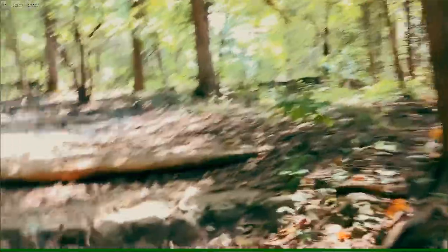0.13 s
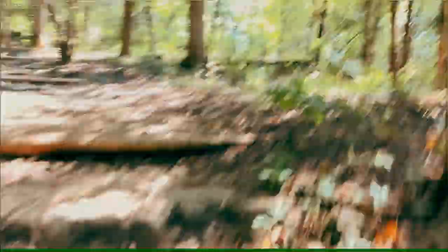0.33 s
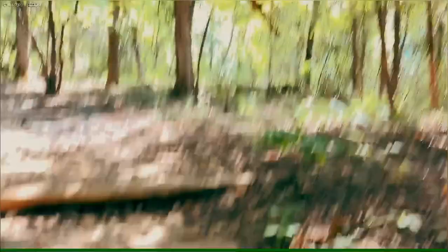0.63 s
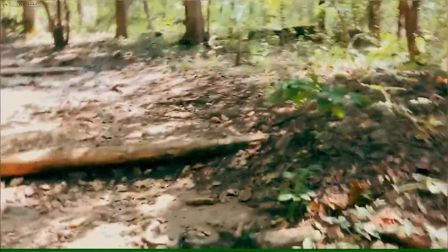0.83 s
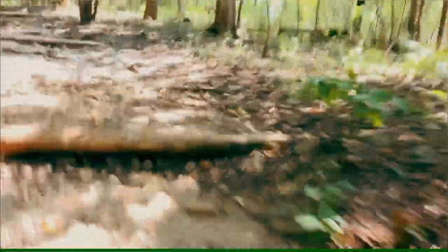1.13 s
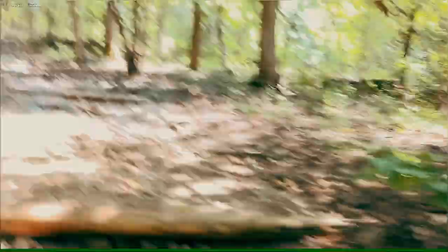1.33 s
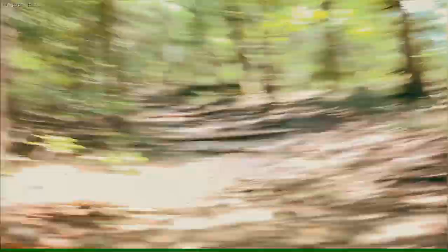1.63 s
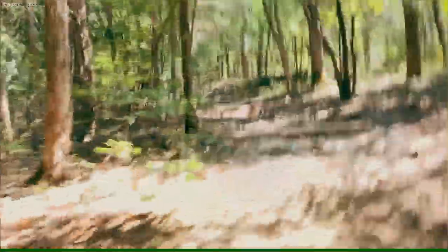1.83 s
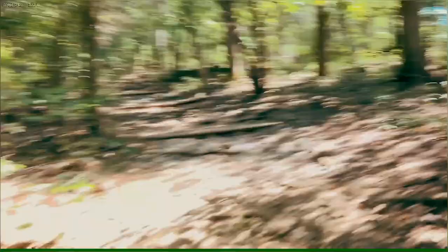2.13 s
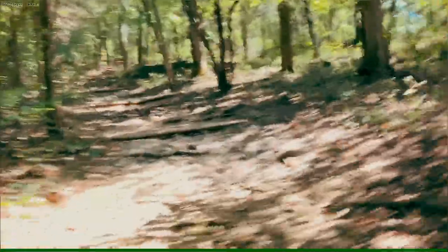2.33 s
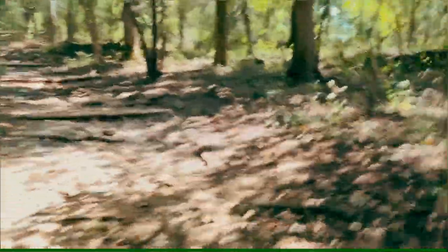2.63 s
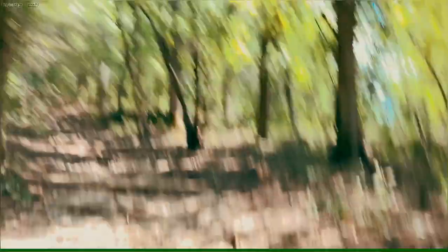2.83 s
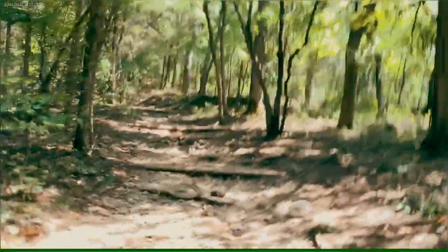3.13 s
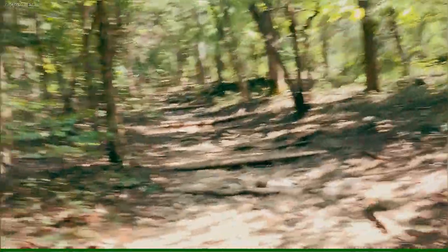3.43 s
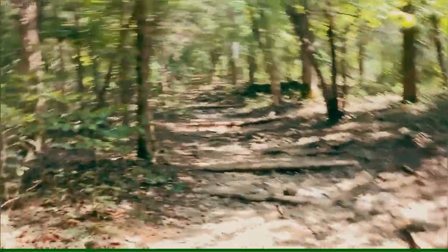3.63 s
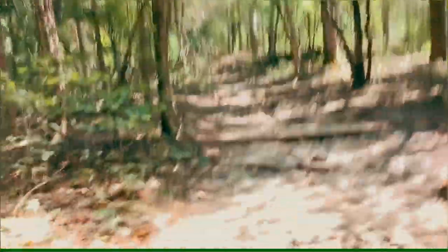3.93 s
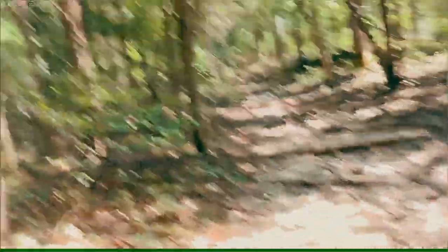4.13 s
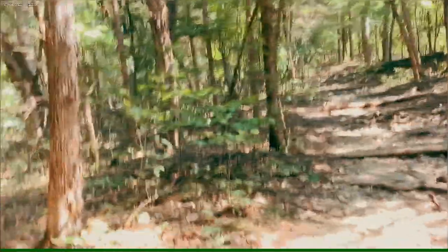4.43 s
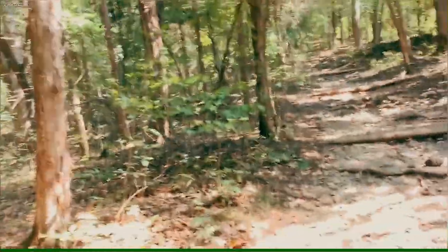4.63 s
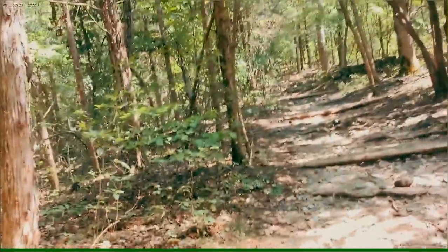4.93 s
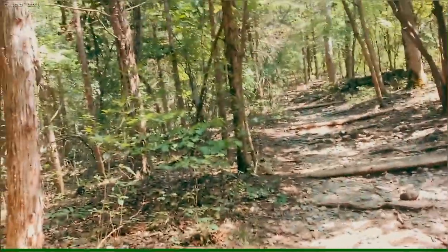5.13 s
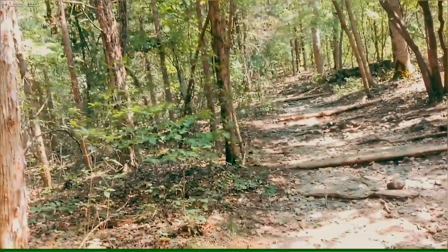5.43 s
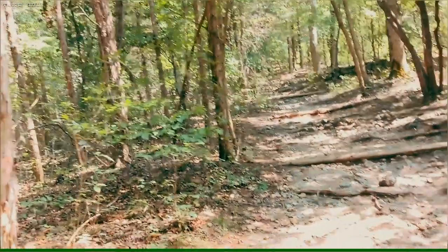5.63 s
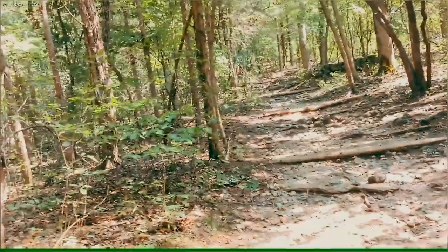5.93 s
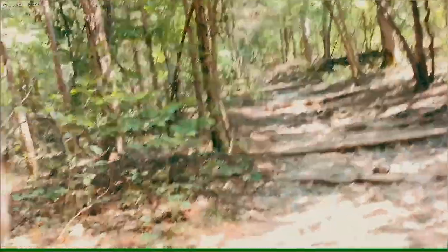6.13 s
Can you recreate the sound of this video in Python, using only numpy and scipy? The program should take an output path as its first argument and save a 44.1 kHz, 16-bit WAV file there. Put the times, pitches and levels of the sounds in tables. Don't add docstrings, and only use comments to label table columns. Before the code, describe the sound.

Outdoors in dry summer woodland, a dense high cicada chorus buzzes and wavers, two nearer singers slowly quickening. A hand-held microphone catches a loud gritty footstep at the start, more scuffs and a low handling knock near two seconds, then a sharp twig snap and finer stalk click near four. One more step follows, then the insects thin out over soft air, with a faint low engine hum.

```python
import sys
import numpy as np
from scipy import signal
from scipy.fft import rfft, irfft, next_fast_len
from scipy.io import wavfile
from scipy.ndimage import uniform_filter1d

SR = 44100
rng = np.random.default_rng(int(sys.argv[2]) if len(sys.argv) > 2 else 0)


def amplitude_ratio(level_db):
    exponent = np.asarray(level_db, float) / 20
    return 10 ** exponent


def int16_out(signal):
    q = np.round(np.clip(np.atleast_2d(signal).T, -1, 1) * 32767)
    wavfile.write(sys.argv[1], SR, q.astype(np.int16))


N = 277355
TIME_S = np.arange(N) / SR


def white():
    return rng.standard_normal(N)


def rms_one(x):
    return x / np.sqrt(np.mean(x ** 2) + 1e-20)


def in_time(rows, silent=None):
    s, *columns = np.transpose(rows)
    return [np.interp(TIME_S, s, column, silent, silent) for column in columns]


def at_hz(points, hz):
    points_hz, points_db = np.transpose(points)
    return np.interp(np.log(hz), np.log(points_hz), points_db, -90, -90)


def drift(rate_hz):
    r = np.exp(-80 * np.pi * rate_hz / SR)
    chance = rng.standard_normal(N // 40 + 2002)
    slow = signal.lfilter([1], [1, -2 * r, r * r], chance)[2000:]
    return np.interp(np.arange(N) / 40, np.arange(len(slow)), rms_one(slow))


def coloured(spectrum, x):
    size = next_fast_len(N)
    hz = np.arange(1, size // 2 + 2) * SR / size
    return rms_one(irfft(rfft(x, size) * amplitude_ratio(at_hz(spectrum, hz)), size)[:N])


def band(x, low_hz, high_hz):
    return signal.sosfilt(signal.butter(2, [low_hz, high_hz], "band", fs=SR, output="sos"), x)


def ring(clicks, hz, t60_s):
    r = amplitude_ratio(-60 / (max(t60_s, 1e-3) * SR))
    w = 2 * np.pi * hz / SR
    return signal.lfilter([0, np.sin(w)], [1, -2 * r * np.cos(w), r * r], clicks + 1e-18)


def clicks_at(times_s, heights):
    out = np.zeros(N)
    np.add.at(out, np.round(np.asarray(times_s) * SR).astype(int), heights)
    return out


def cicada(cycles_hz, spectrum, second, echo_s):
    turns = 2 * np.cumsum(cycles_hz) / SR + rng.random()
    at = np.flatnonzero(np.diff(np.floor(turns)))
    late = (np.ceil(turns[at]) - turns[at]) / (turns[at + 1] - turns[at])
    height = np.where(np.floor(turns[at]) % 2, second[at], 1)
    buckles = np.zeros(N)
    buckles[at] = height * (1 - late)
    buckles[at + 1] = height * late
    echoes = rng.standard_normal(8000) * np.exp(-np.arange(8000) / SR / echo_s)
    return coloured(spectrum, signal.fftconvolve(buckles, echoes)[:N])


def crowd(spectrum, count, hiss_share):
    out = 0
    for start_hz, speeding in rng.uniform([160, 0.3], [195, 1.4], (count, 2)):
        cycles_hz = start_hz + speeding * TIME_S + 0.25 * drift(1.5) + 0.0995 * drift(8.47)
        song = cicada(cycles_hz, spectrum, second=np.full(N, 0.5), echo_s=0.048)
        out = out + amplitude_ratio(0.58 * drift(0.48)) * song
    return rms_one(rms_one(out) + hiss_share * coloured(spectrum, white()))


# (time [s], level [dB])
CHORUS_LEVEL = [(0.0, -38.5), (0.47, -37.5), (0.62, -41), (0.91, -38), (1.1, -41), (1.5, -39),
                (1.89, -38.5), (2.28, -42.5), (2.65, -41.5), (2.94, -39.5), (3.3, -40), (3.9, -43.5),
                (4.1, -41.5), (4.31, -41.5), (4.65, -44), (5.27, -48), (5.69, -47.5), (6.29, -55)]
LOW_LEVEL = [(0.0, -55), (0.3, -64.5), (1.1, -59.5), (2.0, -55.5), (3.0, -56.5), (3.5, -59.5), (3.9, -53.5),
             (4.3, -59.5), (5.27, -64), (6.29, -74)]
# (frequency [Hz], density [dB per Hz])
SONG = [(3060, -47.5), (5200, -16.5), (6390, 0), (6770, 1), (8750, -10.5), (9780, -29.5), (12700, -58),
        (21500, -120)]
LOW_SONG = [(4150, -35), (4400, -1.5), (4700, 4), (5300, -8.5), (6000, 10.5)]
EDGE_SONG = [(8600, -13), (9000, 3.5), (9600, -3.5), (10000, -14), (10250, -35)]


def chorus():
    (main_db,), (low_db,) = in_time(CHORUS_LEVEL), in_time(LOW_LEVEL)
    main_gain = amplitude_ratio(main_db - 3.5 + 0.92 * drift(6.4) + 1.3 * drift(24.0))
    main = main_gain * crowd(SONG, count=6, hiss_share=0.8)
    edge = crowd(EDGE_SONG, count=2, hiss_share=0.97)
    low = amplitude_ratio(low_db + 2.0 * drift(14.0)) * crowd(LOW_SONG, count=3, hiss_share=0.49)
    edge_db, fade_db_per_s, waver_db = -56.5, 4.5, 2.5
    edge_gain = amplitude_ratio(edge_db - fade_db_per_s * TIME_S + waver_db * drift(2.8))
    return main + edge_gain * edge + low


def near_singer(speed, loudness, gain_db, second):
    (cycles_hz,), (level_db,) = in_time(speed), in_time(loudness, silent=-120)
    level = uniform_filter1d(amplitude_ratio(level_db + gain_db), size=4000) * amplitude_ratio(1.5 * drift(4.0))
    return level * cicada(cycles_hz + 0.0824 * drift(7.9), SONG, second, echo_s=0.022)


# (time [s], song cycles [Hz])
SPEED_A = [(0.0, 178.5), (1.0, 179.1), (2.0, 179.95), (3.0, 181.15), (4.0, 182.5), (4.75, 183.3),
           (5.25, 184.6), (5.75, 184.5)]
SPEED_B = [(1.0, 173.0), (1.75, 174.0), (2.5, 174.45), (3.5, 176.4), (4.0, 177.3), (4.5, 179.25),
           (5.5, 178.9)]
# (time [s], level [dB])
LEVEL_A = [(0.0, -45), (0.9, -43), (1.25, -52), (3.75, -49.5), (4.0, -51), (5.0, -48.5), (5.75, -64)]
LEVEL_B = [(1.0, -56), (1.75, -49.5), (3.7, -45), (4.0, -47), (4.4, -45.5), (4.75, -59.5), (5.5, -56.5)]


def near_singers():
    turn_s = 4
    facing = 0.5 * np.tanh(TIME_S - turn_s)
    first = near_singer(SPEED_A, LEVEL_A, gain_db=0.85, second=facing)
    return first + near_singer(SPEED_B, LEVEL_B, gain_db=2.0, second=np.full(N, 0.5))


# (frequency [Hz], density [dB per Hz])
HILLSIDE = [(2530, -49), (4300, -10), (4950, -25), (5090, -10), (5530, -6.5), (6280, -0.5), (6560, 0),
            (7150, 1.5), (9780, -22), (12700, -40), (21500, -120)]


def far_hillside():
    level_db = -50.5
    return amplitude_ratio(level_db - 2.5) * coloured(HILLSIDE, white())


# (frequency [Hz], density [dB per Hz])
AIR = [(150, -1.5), (300, -3.5), (600, -7.5), (1200, -13.5), (2500, -18.5), (4000, -21), (8000, -21.5),
       (10000, -26), (12000, -30), (16000, -30)]


def forest_air():
    level_db = -55.5
    return amplitude_ratio(level_db + 0.43 * drift(2.0)) * coloured(AIR, white())


# (time [s], rise over calm [dB], length [s])
GUSTS = [(0.5, 5, 0.38), (1.134, 17, 0.09), (1.304, 8, .12), (1.855, 5, 0.62), (2.3, 10.5, .12),
         (2.64, 6, 0.2), (3.03, 8, 0.082), (3.43, 2, 0.062), (3.902, 11.5, 0.056), (4.9, 7, 0.33),
         (5.255, 9, 0.055), (5.5, 3, 0.09), (5.764, 8, 0.091), (6.034, 7, 0.2), (6.29, 9, 0.045)]


def wind():
    deep_db, low_db, lumps_db, low_follows = -54.5, -55, 2, 0.044
    gust_db = sum(db * np.exp(-((TIME_S - s) / length_s) ** 2 * 2) for s, db, length_s in GUSTS)
    deep = amplitude_ratio(deep_db + gust_db) * rms_one(band(white(), 24.7, 63.8))
    low_gain = amplitude_ratio(low_db + low_follows * gust_db + lumps_db * drift(2.3))
    return deep + low_gain * rms_one(band(white(), 58.0, 155.7))


def swell(s, db, rise_s, fall_s):
    range_db = 20
    age = TIME_S - s
    spans = np.where(age < 0, -age / max(rise_s, 0.002), age / max(fall_s, 0.002))
    return amplitude_ratio(db - range_db * np.minimum(spans, 6))


# (most pressure [s], level [dB], brightness [dB], build-up [s], dying away [s])
SCUFFS = [(0.258, -40, -8, .02, 0.088), (0.3, -42.5, -8, 0.051, 0.0077), (0.316, -36, -28, 0.0082, 0.023),
          (0.4, -50.5, -10, 0.22, 0.23), (1.058, -47, -20, 0.017, 0.052), (1.214, -47.5, -26, 0.11, 0.014),
          (2.0, -46.5, -8, 0.21, 0.22), (2.113, -43, -22, .012, 0.011), (2.158, -54, -3, .015, 0.12),
          (2.33, -48, -18, 0.036, 0.084), (2.63, -50.5, -12, .06, 0.071), (2.872, -46.5, -16, 0.1, 0.046),
          (3.646, -60, 5, 0.044, .01), (3.75, -55.5, 8, 0.077, .03), (3.784, -56, 7.5, .02, 0.16),
          (4.24, -39.5, -16, 0.014, 0.022), (4.352, -52, -20, 0.046, .03), (4.7, -53.5, -2, .01, 0.1),
          (4.786, -46.5, -9, .012, 0.02)]


def crunch(per_s, spread_db, cycles):
    sizes = amplitude_ratio(spread_db * np.minimum(rng.exponential(1, N), 4)) * rng.choice([-1, 1], N)
    grains = sizes * (rng.random(N) < per_s / SR)
    dealt = rng.integers(0, 16, N)
    pitches_hz = np.geomspace(330, 4600, 16)
    rings = [ring(grains * (dealt == k), hz, cycles / hz) for k, hz in enumerate(pitches_hz)]
    coarse, fine = rms_one(sum(rings[:11])), rms_one(sum(rings[11:]))
    out = np.zeros(N)
    for s, db, bright_db, rise_s, fall_s in SCUFFS:
        out += swell(s, db - 4.5, rise_s, fall_s) * (coarse + amplitude_ratio(bright_db) * fine)
    return out


# (time [s], peak [dB], pitch [Hz], bright tick re peak [dB])
CRACKS = [(0.255, -21, 446, -17), (0.26, -26, 730, -27), (0.268, -23, 550, -6.5), (0.282, -22, 467, -15),
          (0.283, -25, 1490, -2), (0.293, -21.5, 1420, -6), (0.296, -26, 1230, -2), (0.314, -22, 1260, -21),
          (0.364, -35, 970, -16), (0.404, -38, 514, -25), (0.722, -37.5, 645, -10.5),
          (1.055, -30.5, 447, -26), (1.207, -34.5, 730, -21), (1.88, -35.5, 850, -24),
          (1.976, -35, 960, -19), (1.994, -31, 660, -17), (2.035, -31, 533, -6.5), (2.06, -36, 476, -21),
          (2.111, -28, 1310, -26), (2.17, -36.5, 740, -6), (2.23, -32.5, 1300, -26), (2.326, -39, 860, -20),
          (2.838, -41, 501, -21), (2.864, -38, 760, -29), (3.641, -36.5, 1780, -1), (3.777, -32, 999, -5),
          (3.813, -29, 711, -14), (4.23, -32.5, 705, -14), (4.242, -31.5, 1500, -21),
          (4.297, -41.5, 724, -4)]


def cracks():
    rise_s, t60_s = 0.0015, 0.014
    out, age = np.zeros(N), np.arange(1500) / SR
    for s, peak_db, hz, tick_db in CRACKS:
        start = round((s + rise_s) * SR)
        chance = rng.standard_normal((2, 1500))
        crumbs = 0.078 * chance[0] * np.exp(-age / 0.0055)
        push = amplitude_ratio(peak_db - 7.0) * ((age == 0) + crumbs)
        overtone = 0.44 * min(1, 700 / hz) * ring(push, 2.3 * hz, 0.8 * t60_s)
        tick = amplitude_ratio(peak_db + tick_db + 3.5) * band(chance[1] * np.exp(-age / 0.0023), 1250, 4800)
        out[start:start + 1500] += ring(push, hz, t60_s) - overtone + tick
    return out


# (time [s], peak [dB], pitch [Hz])
KNOCKS = [
    (1.119, -33, 45),
    (1.152, -31.5, 35),
    (2.151, -32, 54.6),
    (2.202, -19.5, 73),
]


def knocks():
    out = np.zeros(N)
    for s, peak_db, hz in KNOCKS:
        turn = (TIME_S - s) * hz - 0.3
        out -= amplitude_ratio(peak_db) * np.exp(-(3.0 * turn) ** 2) * np.cos(2 * np.pi * turn + 0.4)
    return out


# (time [s], peak [dB], pitch [Hz], t60 [s])
PEBBLES = [
    (1.774, -51, 996, .08),
    (4.96, -62, 1400, 0.28),
]


def pebbles():
    return sum(ring(clicks_at([s], amplitude_ratio(peak_db)), hz, t60_s) for s, peak_db, hz, t60_s in PEBBLES)


def struck(modes, times_s, blow_db):
    return sum(ring(clicks_at(times_s, amplitude_ratio(blow_db + db)), hz, t60_s) for hz, db, t60_s in modes)


# (time [s], thin ring [dB], woody body [dB])
TWIG = [
    (3.7186, -24, -27),
    (3.7474, -52, -23.5),
    (3.7812, -43, -18.5),
    (3.7846, -28, -18),
    (3.7864, -26, -19.5),
    (3.7909, -4, -11.5),
    (3.7920, -10, -25),
    (3.8027, -18, -43),
    (3.8115, -22, -56),
]
STALK = [
    (3.9840, -20.5, -58),
    (3.9903, -33, -55),
    (3.9954, -13.5, -38),
    (3.9968, -26, -50),
    (3.9982, -42, -60),
]
# (frequency [Hz], level [dB], t60 [s])
LOW_MODES = [(674, 1, 0.0061), (1080, 10.5, 0.0023)]
MIDDLE_MODES = [(2000, -33, 0.0017), (2870, -17, 0.0017), (4230, -6, 0.0072), (5070, -5, 0.0066)]
MAIN_MODES = [(6870, -5, 0.0086), (7530, -10, 0.0035), (8790, -9.5, 0.013)]
TOP_MODES = [(10370, 6, 0.0058), (12400, 2, 0.0032), (14500, -12, .004)]


def twig():
    twig_low_db, stalk_low_db, stalk_top_db = -16, -39, -24.5
    wood = 0
    for rows, low_db in ((TWIG, twig_low_db), (STALK, stalk_low_db)):
        s, thin_db, body_db = np.transpose(rows)
        wood = wood + struck(LOW_MODES, s, body_db + low_db)
        wood = wood + struck(MIDDLE_MODES, s, body_db) + struck(MAIN_MODES, s, thin_db)
    top = struck(TOP_MODES, s, thin_db + stalk_top_db)
    wood_edge = signal.cheby2(8, 50, 10200, fs=SR, output="sos")
    out = signal.sosfilt(wood_edge, band(wood, 300, 9500)) + band(top, 9000, 15500)
    scatter = rng.standard_normal(3000) * amplitude_ratio(-32 - 60 * np.arange(3000) / SR / 0.08)
    return out + signal.fftconvolve(out, scatter)[:N]


# (start [s], length [s], pitch [Hz], level [dB])
HUM = [
    (5.298, 0.15, 94.5, -54),
    (5.478, .42, 97.3, -52),
]


def far_engine():
    ramp_s = 0.044
    out = np.zeros(N)
    for s, length_s, hz, db in HUM:
        inside_s = np.minimum(TIME_S - s, s + length_s - TIME_S)
        gate = np.clip(inside_s / ramp_s + 0.5, 0, 1) ** 2
        out += amplitude_ratio(db + 4.5) * gate * np.sin(2 * np.pi * hz * TIME_S)
    return out


def scene():
    insects = chorus() + near_singers() + far_hillside()
    rumble = wind() + knocks() + far_engine()
    ground = crunch(per_s=2000, spread_db=-2.0, cycles=3.5) + cracks() + pebbles()
    steps = band(ground, 346, 9500) + twig()
    return (insects + forest_air() + rumble + steps)[None]


# (frequency [Hz], share of usual power removed [ratio])
FLOOR_SHARE = [(20, 0), (600, 0.33), (1500, 0.62), (3000, 0.91), (4200, 1), (4700, 0.1), (8800, 0.083),
               (9800, 1.03), (22050, 1.7)]


def thinned_floor(x):
    hz, _, bins = signal.stft(x, SR, nperseg=2048)
    power = np.abs(bins) ** 2 + 1e-20
    usual = uniform_filter1d(np.median(power, axis=1), size=9)[:, None]
    share = np.interp(hz, *np.transpose(FLOOR_SHARE))[:, None]
    steady = uniform_filter1d(power, size=2, axis=1)
    gain = np.sqrt(np.clip(1 - share * usual / steady, 0.01, 1))
    patch = uniform_filter1d(steady, size=5, axis=0)
    gain = gain * (patch > 0.87 * np.minimum(share, 1) * usual)
    return signal.istft(bins * gain, SR, nperseg=2048)[1][:N]


def roll_off(x):
    return signal.sosfilt(signal.butter(12, 15720, fs=SR, output="sos"), x)


def record(dry):
    mix = thinned_floor(dry[0])[None]
    return roll_off(mix)


dry = scene()
out = record(dry)
int16_out(out)
```